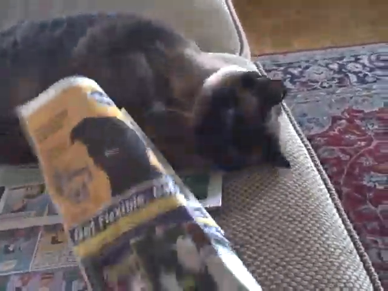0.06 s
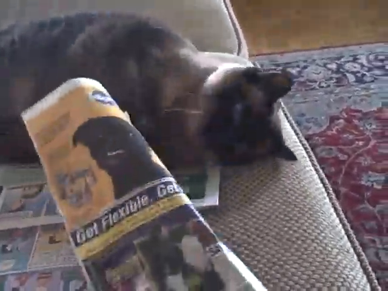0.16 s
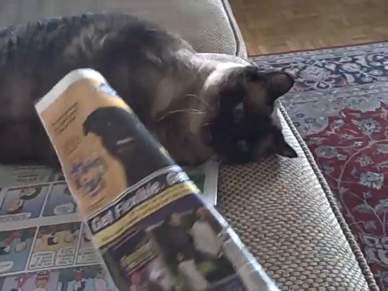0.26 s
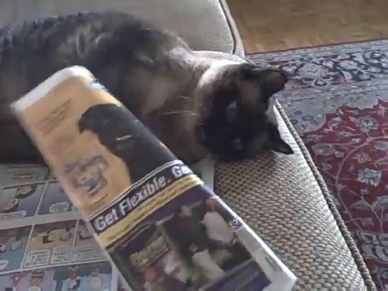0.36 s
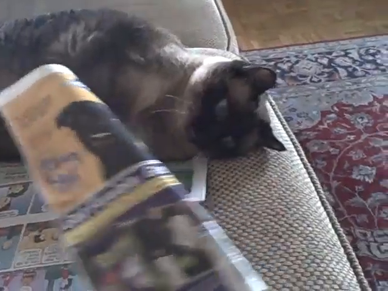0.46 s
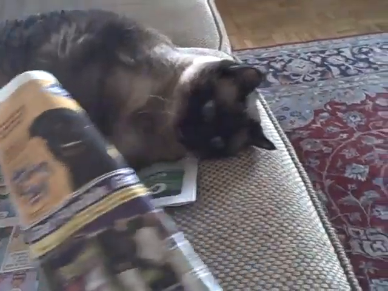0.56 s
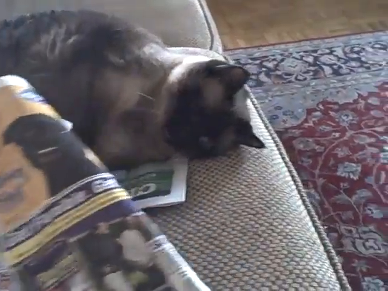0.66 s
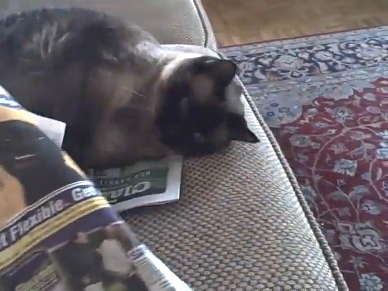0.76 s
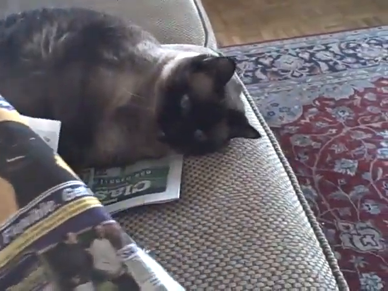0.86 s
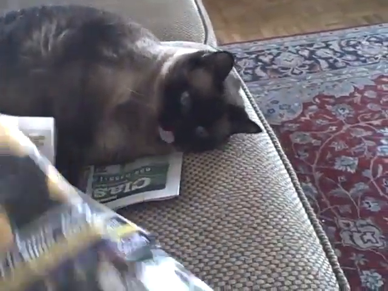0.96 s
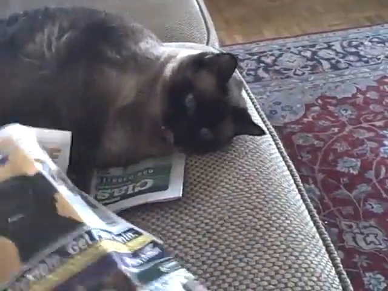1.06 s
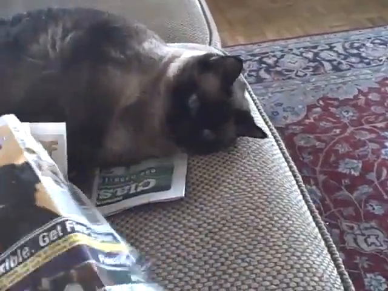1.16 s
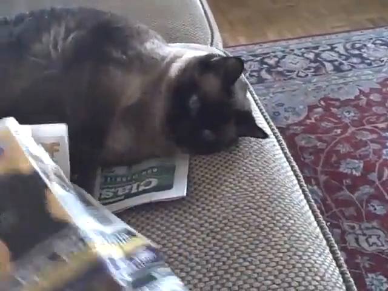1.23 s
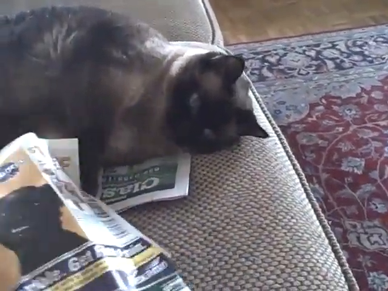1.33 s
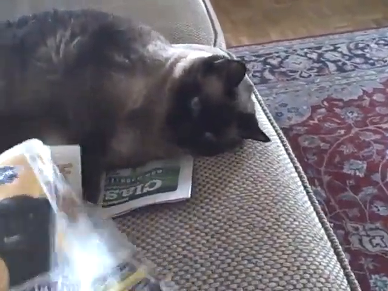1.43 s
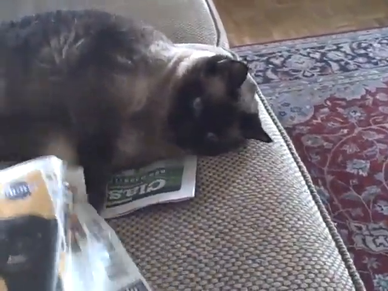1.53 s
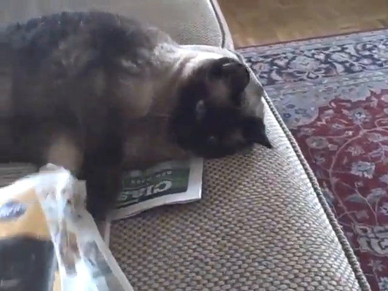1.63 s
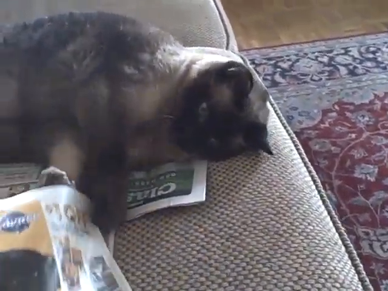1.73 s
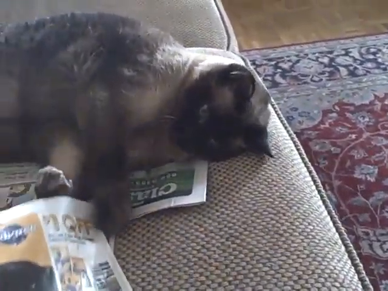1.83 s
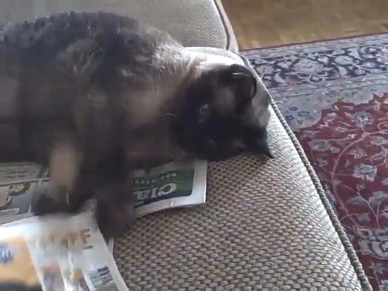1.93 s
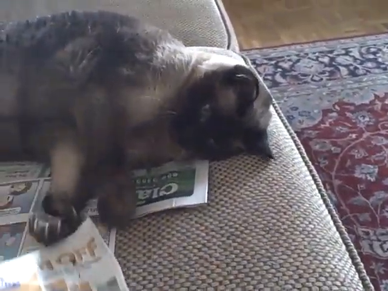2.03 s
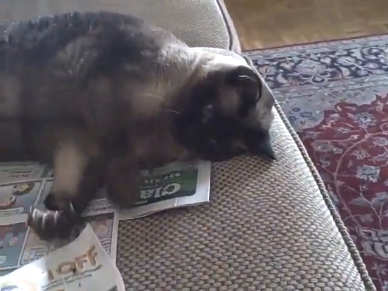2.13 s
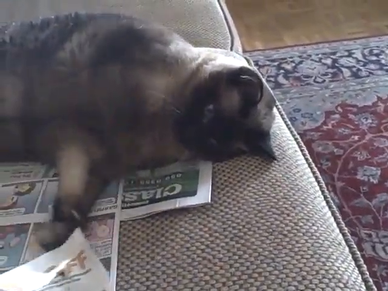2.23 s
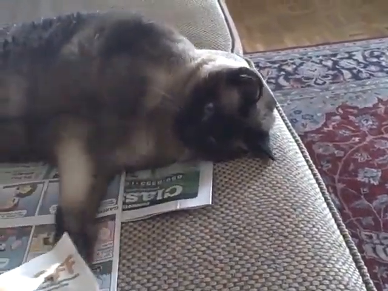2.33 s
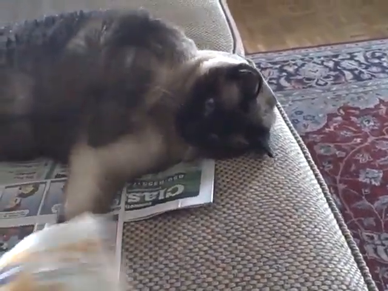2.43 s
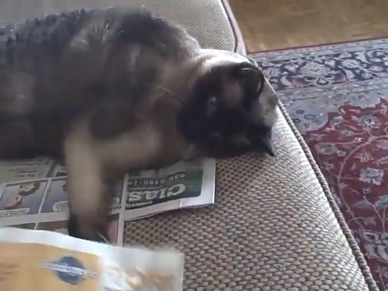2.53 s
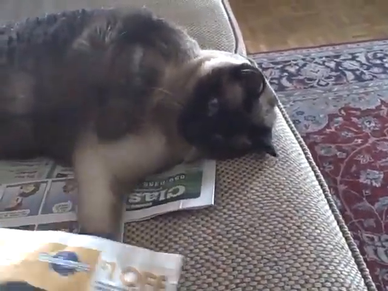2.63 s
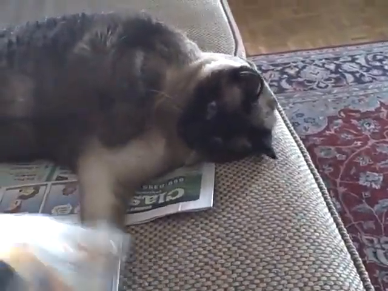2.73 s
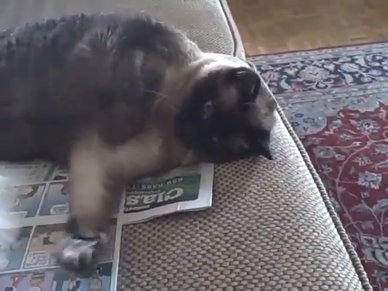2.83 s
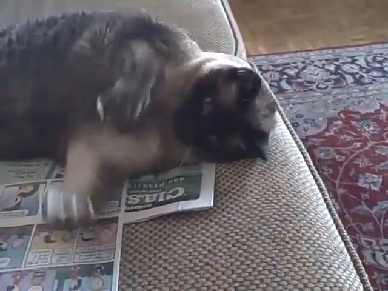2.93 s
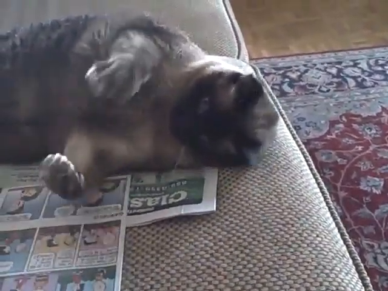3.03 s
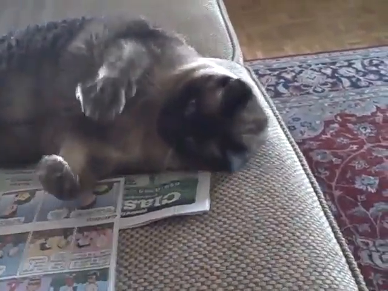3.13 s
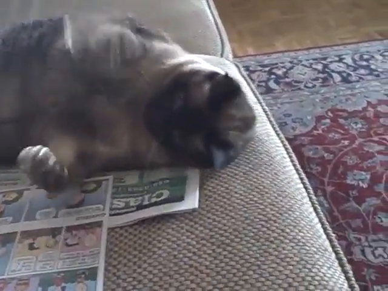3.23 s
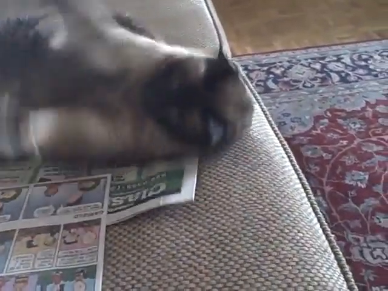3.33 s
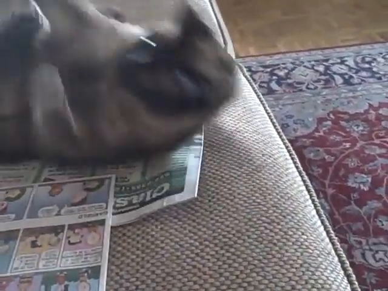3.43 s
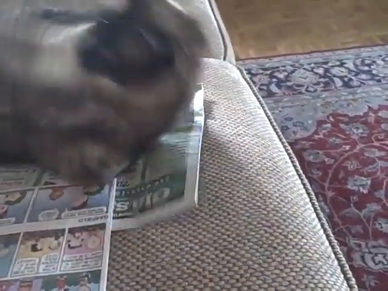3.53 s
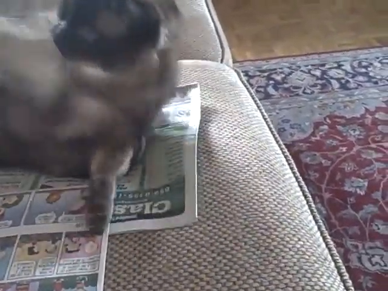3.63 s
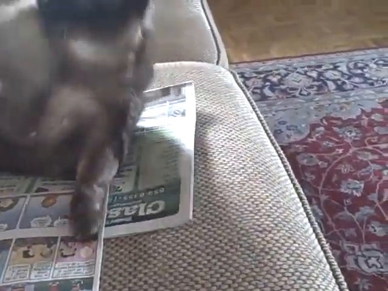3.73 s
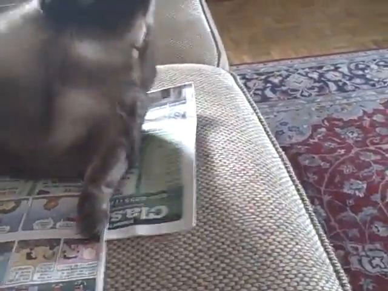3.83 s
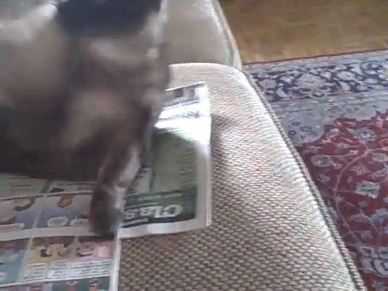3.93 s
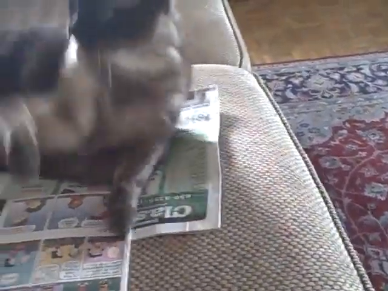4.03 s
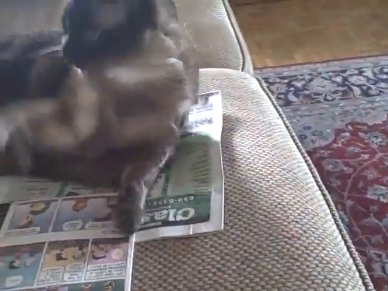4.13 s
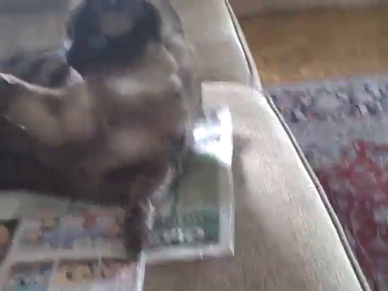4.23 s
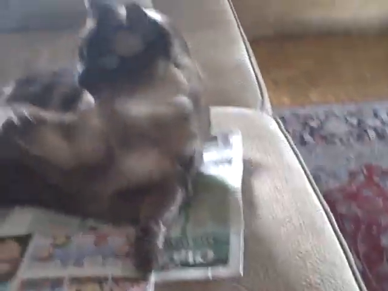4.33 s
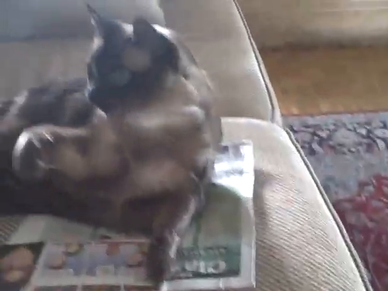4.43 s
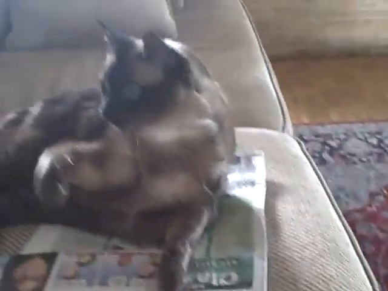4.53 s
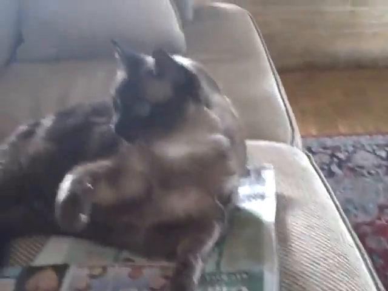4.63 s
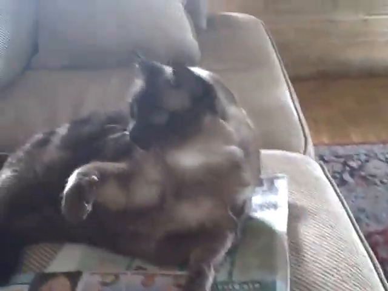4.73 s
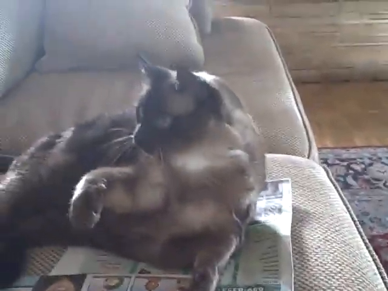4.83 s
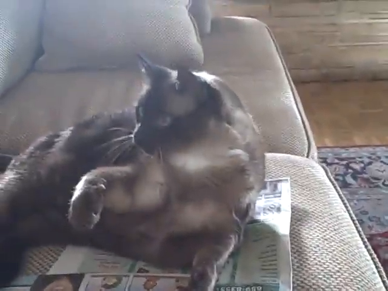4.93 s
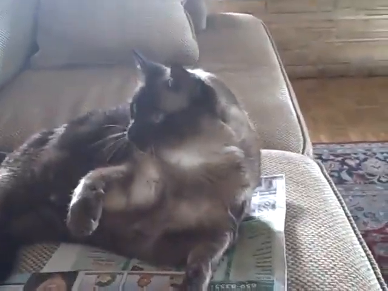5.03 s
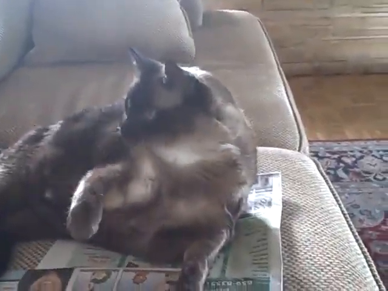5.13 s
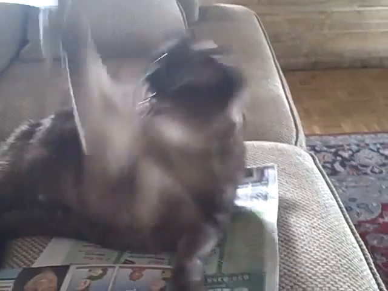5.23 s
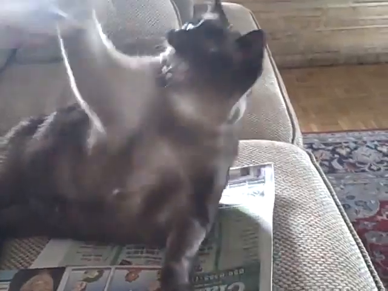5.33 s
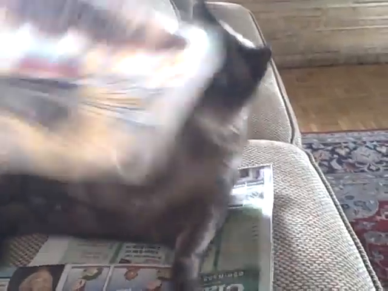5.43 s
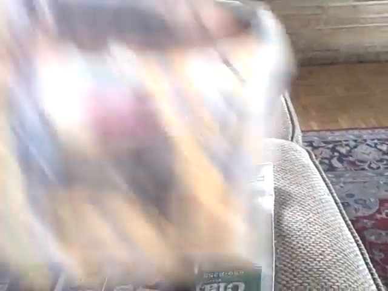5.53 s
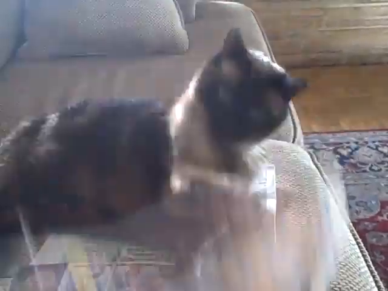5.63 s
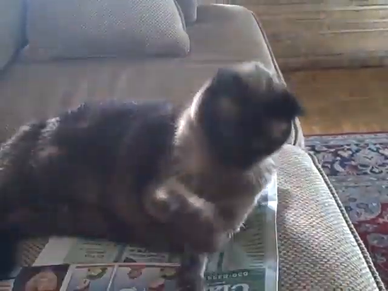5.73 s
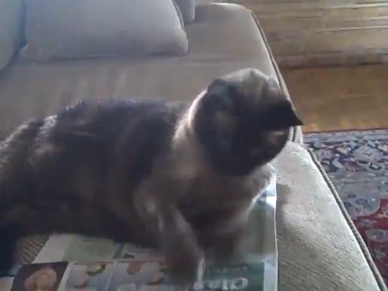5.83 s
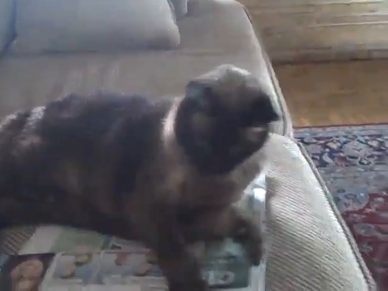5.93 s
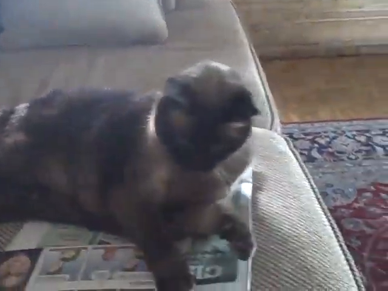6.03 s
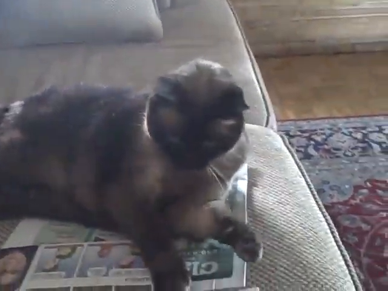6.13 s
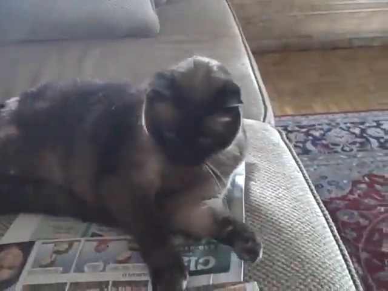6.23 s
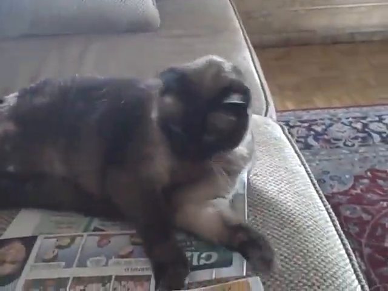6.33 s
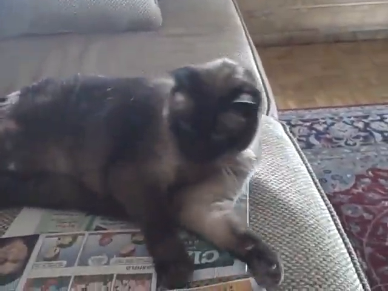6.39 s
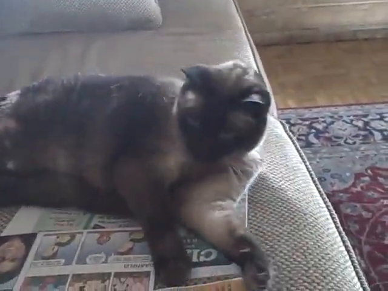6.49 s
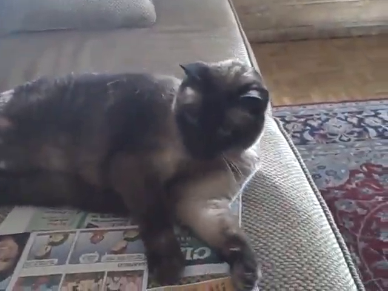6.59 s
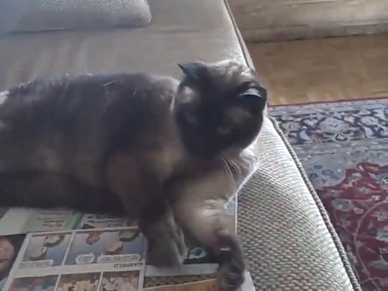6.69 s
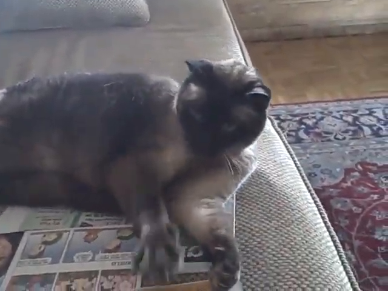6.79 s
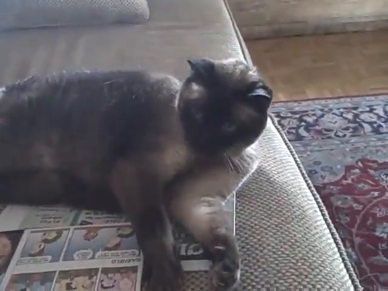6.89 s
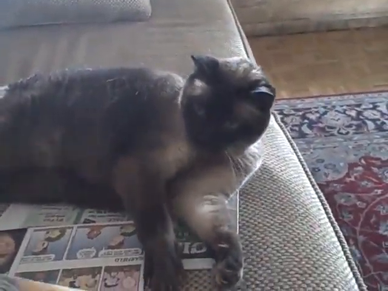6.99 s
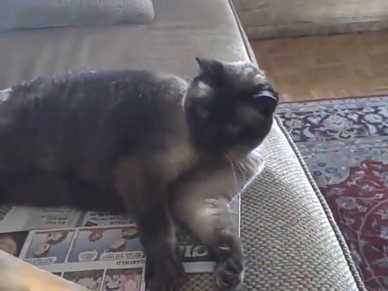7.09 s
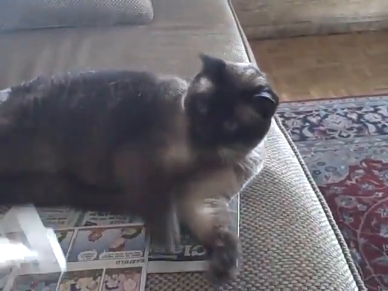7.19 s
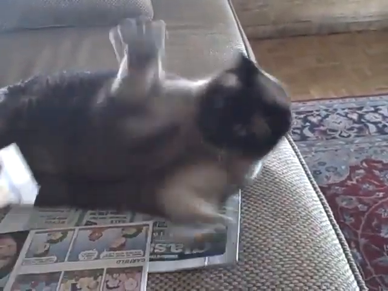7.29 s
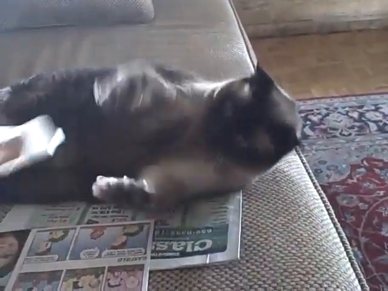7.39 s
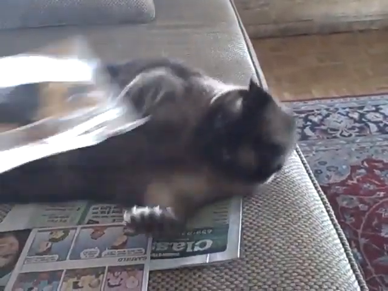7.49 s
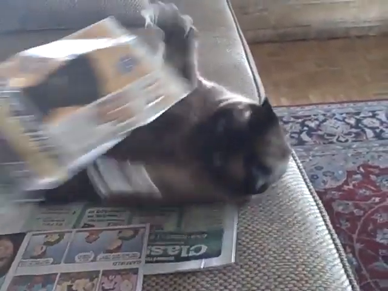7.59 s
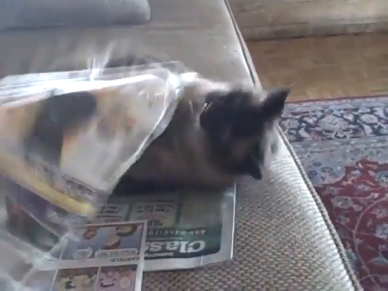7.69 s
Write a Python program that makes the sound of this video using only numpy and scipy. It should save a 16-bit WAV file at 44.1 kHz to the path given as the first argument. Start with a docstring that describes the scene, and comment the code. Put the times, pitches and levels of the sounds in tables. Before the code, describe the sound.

Close, dry newspaper rustles and sharp crackles under a cat's paws, busy at first, then sparser, with a few hollow paper knocks and cushion thuds.

```python
"""Loose newspaper under a cat's paws, on a couch in a quiet living room, close to a small microphone.
Creases snap as short noise bursts; sheets slide and crumple as noise with clumps of tiny crackles.
Paws knock the folds (puffs of noise an octave wide) and thump the cushion (a damped swing and a shudder).
A short soft room tail follows; behind lie rumble, hiss, soft low bumps and faint steady tones."""
import sys
import numpy as np
from scipy import signal
from scipy.fft import rfft, irfft, next_fast_len
from scipy.io import wavfile

SR = 44100
rng = np.random.default_rng(int(sys.argv[2]) if len(sys.argv) > 2 else 0)


def master(y):
    """Save y as 16-bit WAV."""
    cut = np.clip(np.atleast_2d(y).T, -1, 1)
    pcm = np.round(cut * 32767)  # scale
    wavfile.write(sys.argv[1], SR, pcm.astype(np.int16))


N = 341775  # length [samples]

# Creases snapping: (time [s], sheet body level [dB], fibre crack level [dB])
CREASE_SNAPS = [(0.0497, -35.5, -34), (0.112, -32.5, -43), (0.1221, -31, -27), (0.129, -27.5, -22.5),
                (0.2594, -41, -79), (0.317, -27, -47), (0.344, -37.5, -32), (0.376, -44, -51),
                (0.389, -30, -28.5), (0.449, -43, -47), (0.458, -40, -46), (0.7012, -33, -37.5),
                (0.7103, -46.5, -35.5), (0.7518, -45, -29), (0.9463, -39.5, -44), (0.9635, -31, -51),
                (0.9798, -23, -26), (1.0269, -36.5, -64), (1.0694, -30.5, -32), (1.081, -45, -28),
                (1.093, -28.5, -32), (1.105, -35.5, -29), (1.1672, -48, -35.5), (1.2272, -34.5, -42),
                (1.2556, -39, -33), (1.2805, -39, -50), (1.3527, -34, -37.5), (1.3769, -28, -28),
                (1.3927, -32.5, -27.5), (1.4, -29, -37), (1.4268, -53, -29.5), (1.4876, -35, -30),
                (1.513, -25, -22), (1.53, -27, -21.5), (1.554, -29, -11.5), (1.595, -35.5, -40),
                (1.6193, -21.5, -16), (1.6278, -30.5, -14), (1.6824, -35.5, -17.5), (1.745, -32.5, -30),
                (1.753, -39, -29.5), (1.9323, -37.5, -34.5), (1.973, -40.5, -34), (1.991, -41, -31),
                (1.999, -29, -23.5), (2.027, -20.5, -14.5), (2.0618, -37.5, -28), (2.1162, -43, -29),
                (2.3429, -37, -66), (2.4976, -34, -33.5), (2.621, -36, -31), (2.6979, -33, -26.5),
                (2.7141, -36.5, -35), (2.853, -34.5, -26.5), (2.9201, -32, -23.5), (2.9802, -36, -79),
                (3.027, -29.5, -51.5), (3.0438, -28, -34), (3.055, -22, -25.5), (3.1134, -42, -40),
                (3.6455, -37.5, -61), (3.657, -35.5, -57.5), (3.6855, -39, -59), (3.725, -45.5, -36.5),
                (3.797, -46.5, -56), (3.838, -42.5, -42), (3.848, -34, -41), (3.943, -41, -58),
                (3.9909, -43, -41), (4.034, -47.5, -48.5), (4.13, -51, -61), (4.1688, -45, -54),
                (4.282, -44.5, -58.5), (4.4971, -52, -57.5), (4.5423, -42.5, -50), (4.558, -73, -60.5),
                (4.6425, -43.5, -46), (4.6503, -40.5, -66), (4.7774, -36.5, -39), (4.895, -36.5, -35),
                (4.9153, -31, -30), (4.9666, -38.5, -43.5), (5.2365, -36.5, -34.5), (5.3051, -46, -51),
                (5.3511, -42, -31.5), (5.367, -32, -22), (5.4, -35, -27.5), (5.4582, -42.5, -44),
                (5.475, -38, -33), (5.5094, -35, -32), (5.5847, -40, -39), (5.6806, -43.5, -65.5),
                (5.7903, -43.5, -30), (5.8284, -39, -48), (5.8553, -35.5, -52), (5.9087, -48, -48),
                (6.0237, -37.5, -39), (6.75, -46, -66.5), (6.784, -37.5, -31.5), (6.8021, -34.5, -36),
                (6.8273, -42.5, -40.5), (6.9741, -31.5, -27), (7.047, -36, -42), (7.0547, -38, -27),
                (7.105, -31.5, -48), (7.1237, -35.5, -34), (7.144, -41.5, -18.5), (7.2868, -27, -18.5),
                (7.3403, -41, -46), (7.487, -38.5, -34.5), (7.5328, -40, -33)]
# Swats and crumples, nominal levels:
# (time of full force [s], time held [s], sheet body level [dB], fine crackle level [dB])
PAPER_CRUMPLES = [(0.0, .1, -49, -53.5), (0.12, 0.0071, -37, -44), (1.075, .035, -40.5, -47),
                  (1.34, .06, -42.5, -50.5), (1.545, .012, -29, -21), (1.612, 0.075, -32, -31),
                  (2.486, 0.037, -38.5, -43.5), (3.74, 0.037, -46.5, -43), (5.374, 0.033, -35.5, -28.5),
                  (5.435, 0.085, -41, -46), (5.795, .012, -53.5, -47.5), (6.95, 0.082, -59.5, -45.5),
                  (7.05, 0.15, -50, -50), (7.75, .01, -32, -28.5)]
# Sheets sliding quietly between the swats, nominal levels:
# (time [s], sheet body level [dB], fine crackle level [dB])
SHEET_SLIDING = [(0.2, -55, -69.5), (0.42, -54.5, -58), (0.67, -77.5, -84), (0.84, -63, -57.5),
                 (1.72, -41, -57.5), (1.79, -58, -54.5), (2.25, -70.5, -59.5), (2.45, -59.5, -56),
                 (2.879, -49, -53.5), (3.351, -68, -74.5), (3.7, -63, -70.5), (3.85, -58, -61),
                 (4.35, -70, -79.5), (4.5, -63.5, -78.5), (4.92, -55, -56), (5.13, -70.5, -87),
                 (5.27, -53.5, -51), (5.7, -84, -83), (5.84, -50, -47.5), (6.03, -62.5, -72.5),
                 (6.151, -80, -83), (6.6, -72.5, -64.5), (6.74, -72.5, -69), (6.85, -57, -55.5),
                 (7.3, -51.5, -56), (7.45, -63.5, -70.5)]
# Colour of the flexing sheet: (frequency [Hz], relative density [dB per Hz])
SHEET_COLOUR = [(120, -7), (300, -9.5), (600, -8), (1300, -2.5), (2400, 0), (3600, -4.5), (5000, -9),
                (8000, -24)]
# Colour of the cracking fibres: (frequency [Hz], relative density [dB per Hz])
FIBRE_COLOUR = [(2200, -15), (4500, -5.5), (7000, -6.5), (10500, -11.5), (16500, -17)]
# Hollow knocks of a paw on the folded sheets: (time [s], peak level [dB], pitch [Hz])
PAW_KNOCKS = [(2.329, -31.5, 930), (4.913, -26, 617), (7.162, -25.5, 990), (7.285, -20.5, 960)]
# Paws and sheets landing on the cushion: (time [s], push level [dB])
CUSHION_THUMPS = [(1.643, -24), (2.633, -19.5), (5.505, -29), (6.007, -28.5), (7.284, -40)]
# Colour of room rumble and microphone hiss: (frequency [Hz], relative density [dB per Hz])
FLOOR_COLOUR = [(25, 4), (100, 0.5), (300, -7), (700, -11), (2400, -21), (9000, -25), (17000, -24)]
# Soft low bumps under the rustle, all at one level: (time [s])
LOW_BUMPS = [.21, .3, 3.311, 3.62, 4.03, 4.27, 4.385, 4.49, 5.01, 5.3, 6.43, 6.66, 7.11, 7.37]
# Faint steady tones: (frequency [Hz], rms level [dB])
STEADY_TONES = [(769.8, -79), (1254, -79)]

SNAP_RISE_S, SHEET_T60_S, FIBRE_T60_S = 0.00017, 0.02, 0.011
# Crumple envelope; pairs are (sheet body, fine crackle)
SWELL_S = 0.02
FALL_DB_PER_S, SETTLE_DB_PER_S = (289.5, 423.5), (106, 113.5)
SETTLE_DROP_DB = (15, 15.5)  # where the slow settling line starts, below the peak
GRAIN_SPREAD_DB, CLUMP_DB = 4, 3  # scatter of crackle sizes, wander of their rate
BEND_DB = 3.5  # how far the bands of the sheet's colour wander
KNOCK_T60_S = 0.016
CUSHION_HZ, CUSHION_T60_S, SHUDDER_T60_S = 175, 0.0056, 0.12
ROOM_T60_S, ROOM_DB, ROOM_CUT_HZ = 0.15, -22, 7000
FLOOR_DB = -61.5
BUMP_S, BUMP_DB = 0.07, -56  # whole width, rms level at the top of the swell
STOP_HZ = 17400  # 60 dB down from here up


def paper():
    """Snaps and rustle excite the same sheet and the same fibres."""
    body_db, crackle_db = handling_db()
    # The harder the handling, the denser the crackle; gentle sliding stays smooth.
    busy = from_db(0.3 * (body_db + 45))
    buckles = grains(300 * busy, grain_t60=0.012) * np.minimum(busy, 1)
    body, treble = snap_bursts()
    # The constant part is sheet sliding on sheet.
    body = body + (0.5 + 0.7 * buckles) * from_db(body_db)
    treble = treble + (0.5 + 0.8 * buckles) * from_db(crackle_db)
    sheet_noise, fibre_noise = rng.standard_normal((2, N))
    sheet = coloured(body * bending(sheet_noise), SHEET_COLOUR)
    fibres = coloured(treble * fibre_noise, FIBRE_COLOUR)
    return sheet + fibres


def snap_bursts():
    """Snap envelopes for sheet and fibres: a quick swell, a fast death, faster in the treble."""
    s, *levels_db = np.transpose(CREASE_SNAPS)
    clicks = np.zeros((2, N))
    clicks[:, np.round(s * SR).astype(int)] = from_db(levels_db)
    t = np.arange(SR // 20) / SR
    decay = from_db(-60 * t / [[SHEET_T60_S], [FIBRE_T60_S]])
    shape = decay * (1 - np.exp(-t / SNAP_RISE_S))
    shape = shape / shape.max(axis=1, keepdims=True)
    return signal.fftconvolve(clicks, shape, axes=1)[:, :N]


def handling_db():
    """Body and crackle levels: crumples swell, hold, die fast and settle slowly, on top of sliding."""
    t = np.arange(0, N + 32, 32) / SR
    s, *sliding_db = np.transpose(SHEET_SLIDING)
    start, held, *peaks_db = np.transpose(PAPER_CRUMPLES)[:, :, None]
    early = np.maximum(start - t, 0)
    late = np.maximum(t - start - held, 0)
    swell = np.maximum(1 - early / SWELL_S, 0) ** 2
    levels = []
    for k in range(2):
        fast = FALL_DB_PER_S[k] * late
        slow = SETTLE_DROP_DB[k] + SETTLE_DB_PER_S[k] * late
        crumples = swell * from_db(peaks_db[k] - np.minimum(fast, slow))
        sliding_power = from_db(2 * np.interp(t, s, sliding_db[k]))
        level_db = 10 * np.log10((crumples ** 2).sum(axis=0) + sliding_power)
        levels.append(np.interp(np.arange(N) / SR, t, level_db))
    return levels


def grains(per_s, grain_t60):
    """Envelope of tiny buckles at random moments, in clumps, each dying fast; mean power 1."""
    clumped_rate = per_s * from_db(CLUMP_DB * drift(40))
    born = rng.random(N) < clumped_rate / SR
    scatter_db = GRAIN_SPREAD_DB * np.minimum(rng.exponential(1, N), 3)
    sizes = born * from_db(scatter_db) / np.sqrt(per_s)  # denser grains are smaller
    return rms_one(dying(sizes + 1e-18, grain_t60))


def bending(x):
    """The sheet rings differently with every fold: four bands of its sound rise and sink apart."""
    lows = [0 * x]
    for hz in (600, 1200, 2400):
        lows.append(signal.sosfiltfilt(signal.butter(2, hz, fs=SR, output="sos"), x))
    bands = np.diff(lows + [x], axis=0)
    return sum(band * rms_one(from_db(BEND_DB * drift(17.0))) for band in bands)


def knocks():
    """Each knock of a paw is a short puff of noise an octave wide around its pitch."""
    out = np.zeros(N)
    t = np.arange(SR // 20) / SR
    for s, peak_db, hz in PAW_KNOCKS:
        puff = rng.standard_normal(len(t)) * from_db(-60 * t / KNOCK_T60_S)
        edges = [hz / np.sqrt(2), hz * np.sqrt(2)]
        puff = signal.sosfilt(signal.butter(1, edges, "band", fs=SR, output="sos"), puff)
        out[round(s * SR):][:len(t)] += from_db(peak_db) * puff / np.abs(puff).max()
    return out


def cushion():
    """A soft push sets the padding swinging once; a loose low shudder follows."""
    pushes = np.full(N, 1e-18)
    for s, push_db in CUSHION_THUMPS:
        pushes[round(s * SR)] = from_db(push_db)
    r = from_db(-60 / (CUSHION_T60_S * SR))
    w = 2 * np.pi * CUSHION_HZ / SR
    swing = signal.lfilter([0, np.sin(w)], [1, -2 * r * np.cos(w), r * r], pushes)
    swing = signal.sosfilt(signal.butter(2, 600.0, fs=SR, output="sos"), swing)
    shudder = 1.52 * rng.standard_normal(N) * dying(pushes, SHUDDER_T60_S)
    shudder = signal.sosfilt(signal.butter(2, [40.0, 130.0], "band", fs=SR, output="sos"), shudder)
    return swing + shudder


def room(x):
    """The short tail of a soft-furnished room: dull noise dying away."""
    t = np.arange(SR // 2) / SR
    onset = 1 - np.exp(-t / 0.00083)
    tail = rng.standard_normal(len(t)) * from_db(-60 * t / ROOM_T60_S) * onset
    tail = signal.sosfilt(signal.butter(1, ROOM_CUT_HZ, fs=SR, output="sos"), tail)
    tail = tail / np.sqrt(np.sum(tail ** 2))  # energy 1
    return from_db(ROOM_DB) * signal.fftconvolve(x, tail)[:N]


def background():
    """Rumble and hiss as coloured noise, low bumps as swells of low noise, steady tones as sines."""
    floor = from_db(FLOOR_DB) * coloured(rng.standard_normal(N), FLOOR_COLOUR)
    t = np.arange(N) / SR
    swell = sum(np.maximum(1 - 2 * np.abs(t - s) / BUMP_S, 0) for s in LOW_BUMPS)
    low_band = signal.butter(2, [40.0, 180.0], "band", fs=SR, output="sos")
    lows = signal.sosfilt(low_band, rng.standard_normal(N))
    bumps = from_db(BUMP_DB) * swell * rms_one(lows)
    tones = sum(np.sqrt(2) * from_db(db) * np.sin(2 * np.pi * hz * t) for hz, db in STEADY_TONES)
    return floor + bumps + tones


def from_db(db):
    """Gain of a level in dB."""
    return 10 ** (np.asarray(db) / 20)


def rms_one(x):
    """Scaled to rms 1."""
    return x / np.sqrt(np.mean(x ** 2) + 1e-20)


def dying(x, t60):
    """Each impulse of x dies exponentially, by 60 dB in t60 seconds."""
    return signal.lfilter([1], [1, -from_db(-60 / (t60 * SR))], x)


def drift(rate):
    """Slow chance of rms 1: noise twice through a one-pole low-pass at rate [Hz], run in."""
    r = np.exp(-20 * np.pi * rate / SR)  # one step is ten samples
    noise = rng.standard_normal(N // 10 + 4002)
    slow = signal.lfilter([1], [1, -2 * r, r * r], noise)[4000:]
    return np.interp(np.arange(N) / 10, np.arange(len(slow)), rms_one(slow))


def coloured(x, spectrum):
    """Gives x the colour of a spectrum; white noise of rms 1 keeps rms 1."""
    hz_points, db_points = np.transpose(spectrum)
    size = next_fast_len(N)
    hz = np.maximum(np.arange(size // 2 + 1) * SR / size, 1)
    gain = from_db(np.interp(np.log(hz), np.log(hz_points), db_points, left=-80))
    return irfft(rfft(x, size) * rms_one(gain), size)[:N]


def scene():
    """Paper and paws close by, their tail in the room, and the background."""
    near = paper() + knocks() + cushion()
    return (near + room(near) + background())[None]


def record(dry):
    """A steep low-pass cuts the top."""
    return signal.sosfilt(signal.cheby2(16, 60, STOP_HZ, fs=SR, output="sos"), dry)


dry = scene()
out = record(dry)
master(out)
```